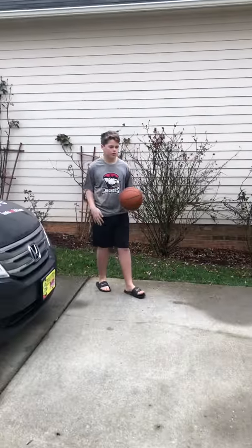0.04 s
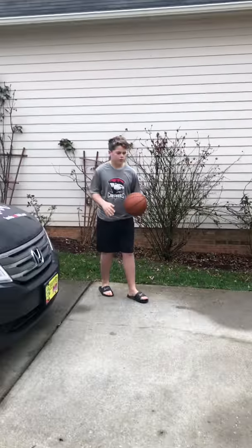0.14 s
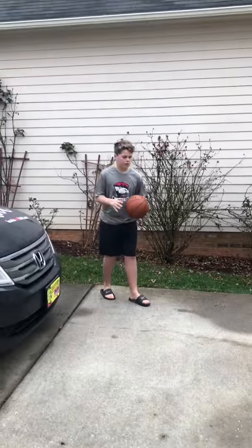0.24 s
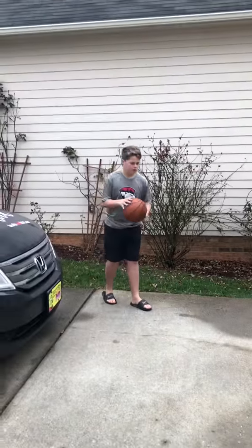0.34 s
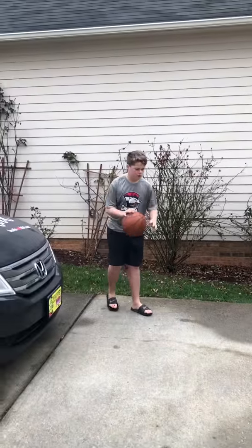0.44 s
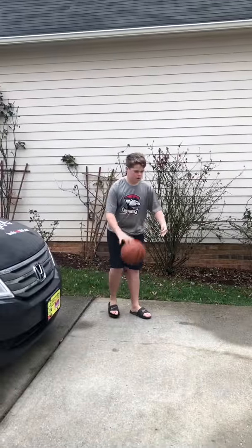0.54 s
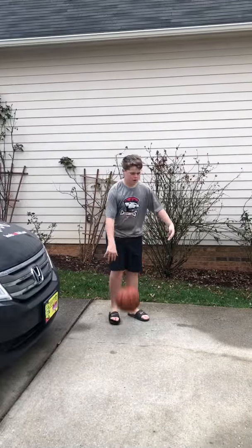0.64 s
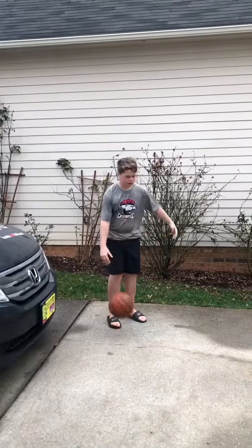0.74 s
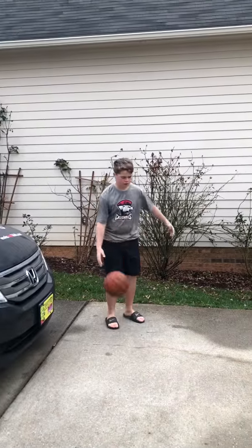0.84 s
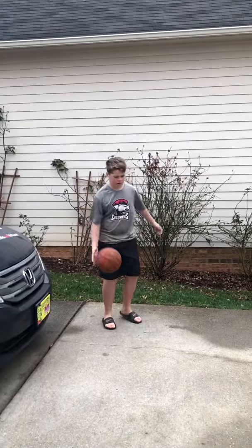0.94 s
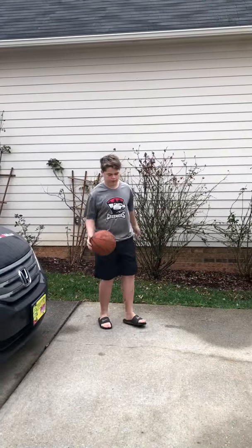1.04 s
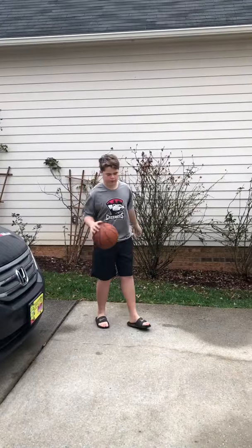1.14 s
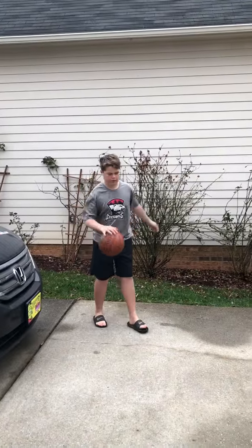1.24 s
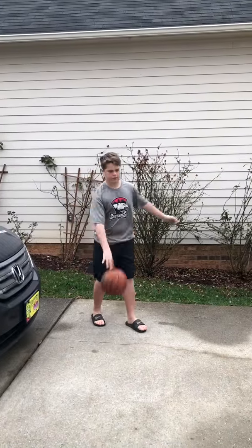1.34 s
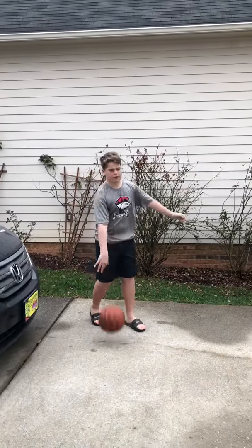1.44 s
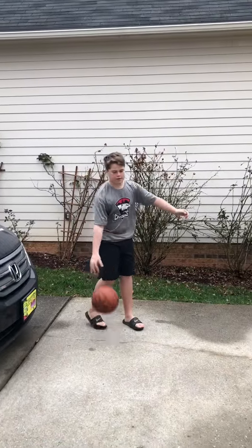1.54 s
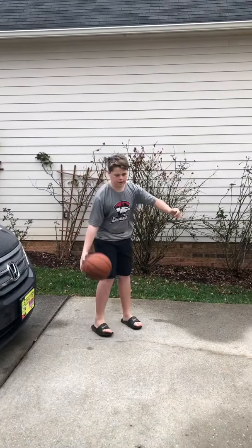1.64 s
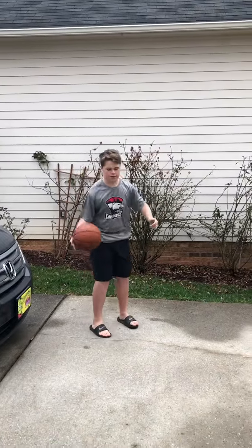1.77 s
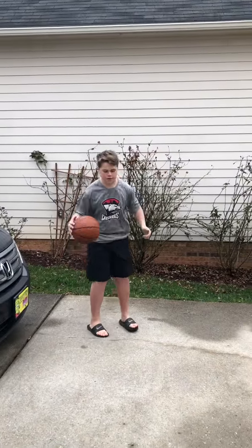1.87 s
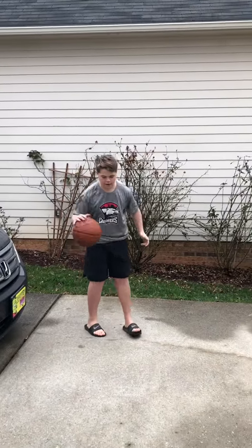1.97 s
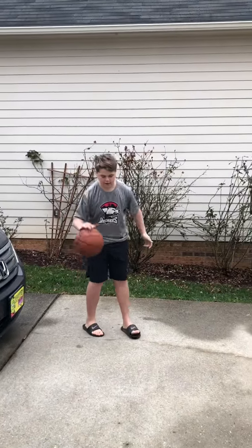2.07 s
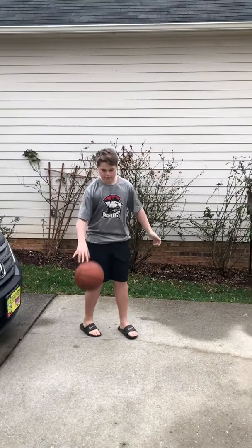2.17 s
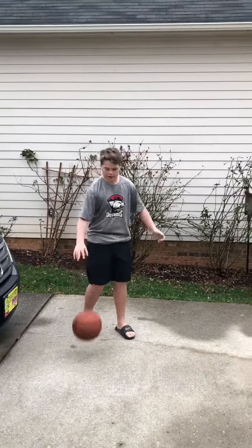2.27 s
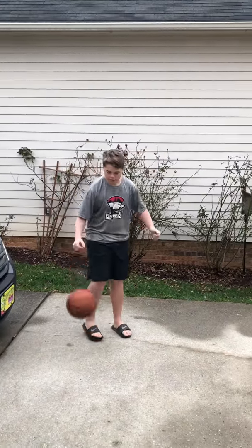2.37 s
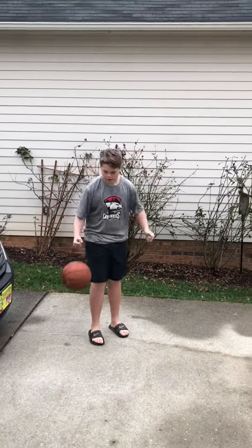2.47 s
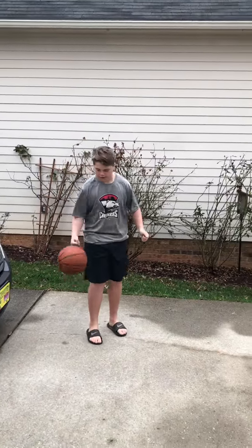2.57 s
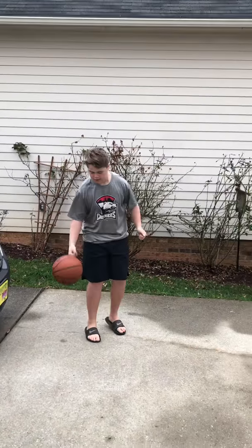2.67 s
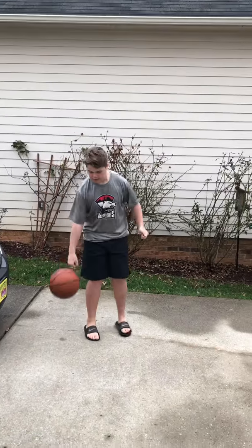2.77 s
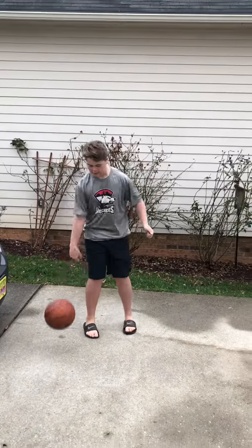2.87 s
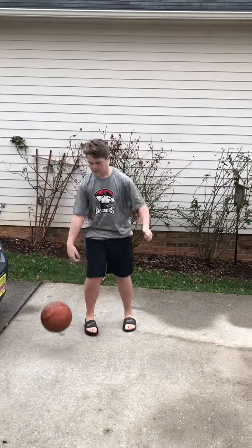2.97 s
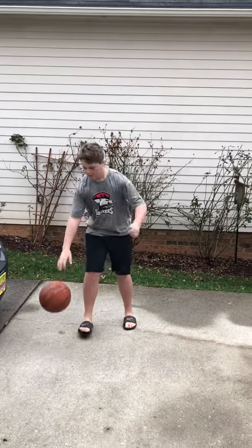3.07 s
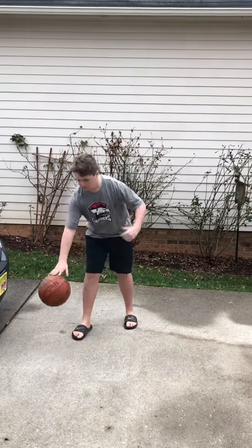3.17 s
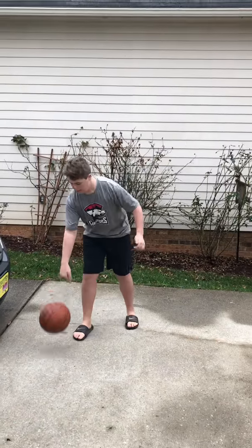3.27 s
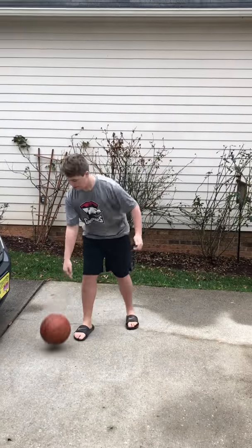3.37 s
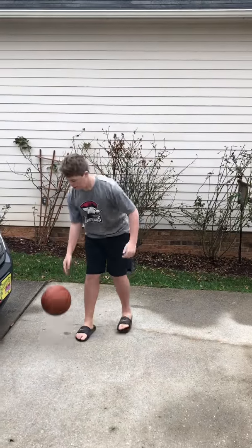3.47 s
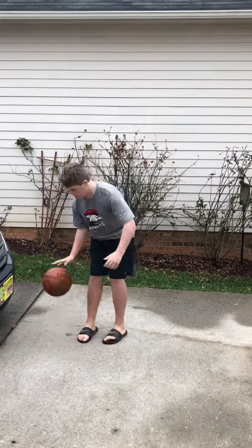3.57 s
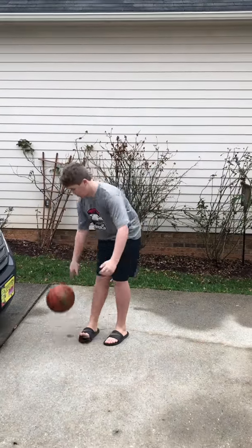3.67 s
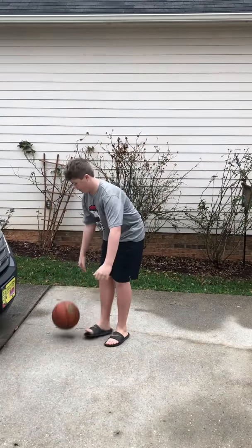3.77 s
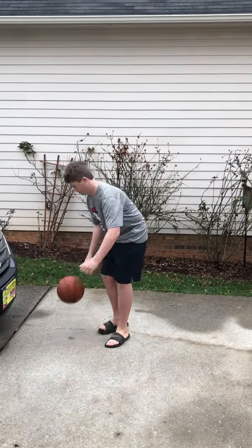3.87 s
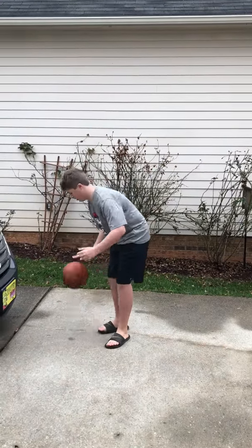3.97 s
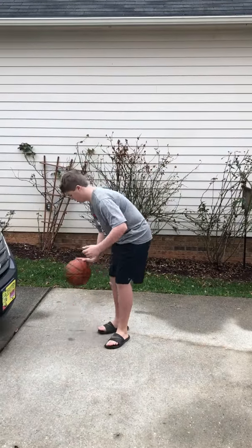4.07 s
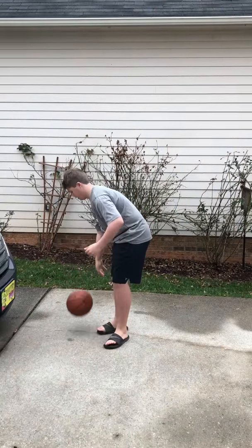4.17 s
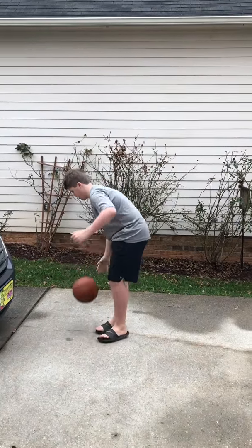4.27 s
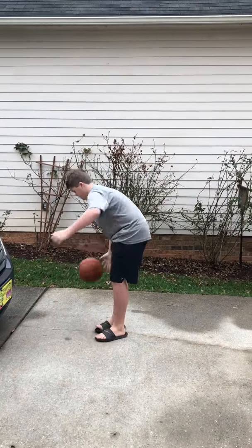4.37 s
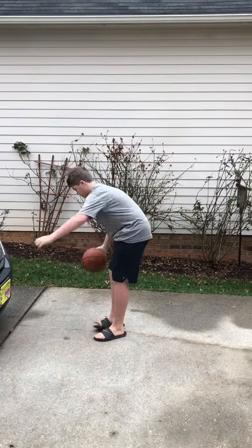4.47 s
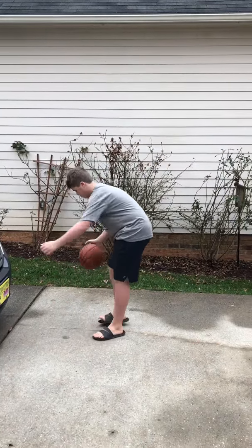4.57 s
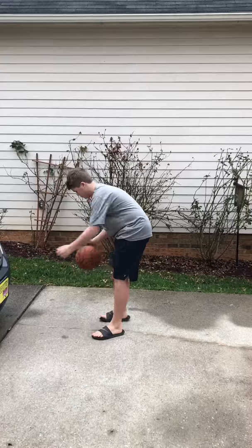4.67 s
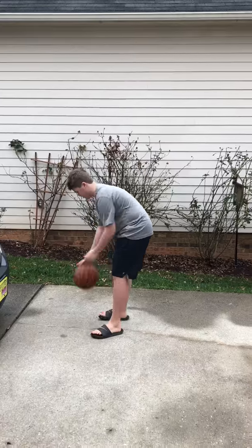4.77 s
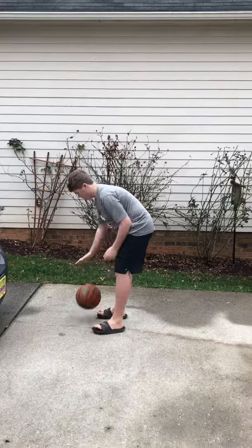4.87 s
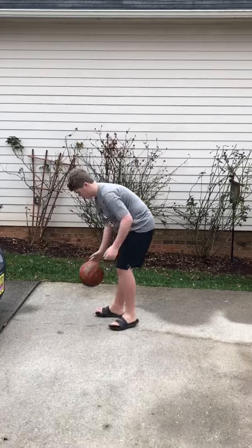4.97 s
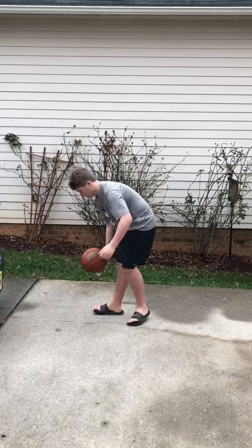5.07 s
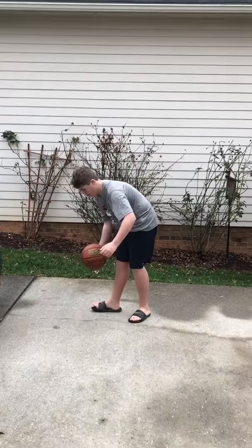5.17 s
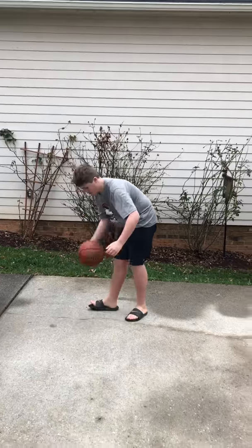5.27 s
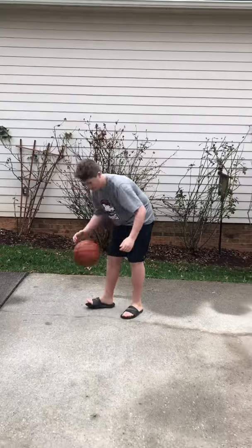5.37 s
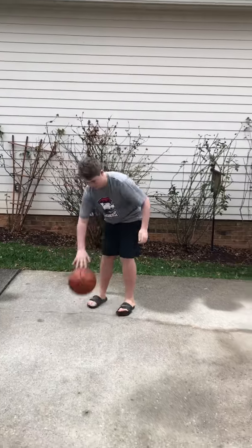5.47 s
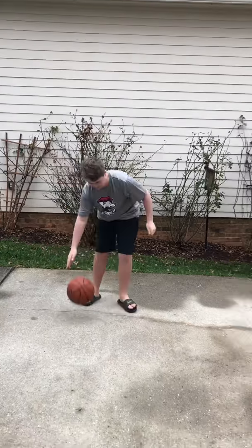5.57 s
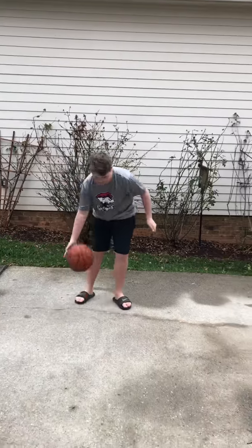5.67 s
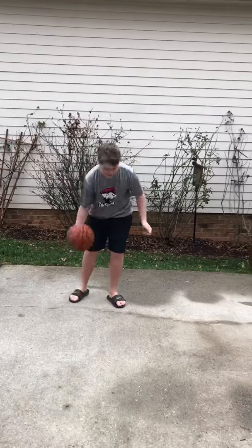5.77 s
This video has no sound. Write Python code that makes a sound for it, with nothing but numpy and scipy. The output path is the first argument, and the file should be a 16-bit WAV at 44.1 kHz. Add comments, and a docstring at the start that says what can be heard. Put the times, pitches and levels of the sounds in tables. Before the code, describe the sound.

A basketball bounces on a concrete driveway with deep thumps and sharp smacks, while sandals scuff and a faint low hum lingers outdoors.

```python
"""A basketball is dribbled on a concrete driveway in front of a house wall with lapped siding.
Each bounce sums damped shell modes (thump), filtered noise (knock, crack) and ringing modes of the air inside.
Hands pat the ball with swelling pops; sandals scuff and slap as noise under grit and swell envelopes.
A filtered echo train (wall) and decaying noise bands (yard) answer; coloured noise and a wavering
sine make the outdoor air and a distant machine's hum."""
import sys
import numpy as np
from scipy import signal
from scipy.fft import rfft, irfft
from scipy.io import wavfile

SR = 44100
rng = np.random.default_rng(int(sys.argv[2]) if len(sys.argv) > 2 else 0)


def log_audio(samples):
    """Write samples as a 16-bit WAV file to the path given in sys.argv[1]."""
    # one column per channel
    frames = np.atleast_2d(samples).T
    # limit to full scale, then quantise
    limited = np.clip(frames, -1, 1)
    pcm = np.round(limited * 32767).astype(np.int16)
    wavfile.write(sys.argv[1], SR, pcm)


N = 256662
TIME = np.arange(N) / SR
AGE = TIME[:SR * 3 // 4]   # time since a contact [s]
WALL_ECHO_S = 0.0226

# soles dragging on concrete: (peak time [s], level [dB], time to swell or die by 10 dB [s],
# grittiness [0-1], brightness [dB])
SCUFFS = [(.415, -57, .03, 0.85, 15), (0.985, -49.5, 0.03, 0.6, 10), (1.11, -52.5, 0.01, 0.78, -8),
          (1.272, -53.5, 0.06, 0.88, -2.5), (1.839, -56, .035, 0.6, -12), (2.0, -45.5, 0.02, 0.95, -1.5),
          (2.793, -44, 0.0541, 0.47, -4.5), (2.875, -47, 0.0259, .3, -7.5), (3.02, -50.5, 0.02, 0.5, 2),
          (3.188, -48.5, .011, 0.67, -4), (3.797, -34, 0.044, 0.05, -2.5), (4.212, -48.5, .04, 0.83, 0.5),
          (4.699, -41.5, 0.01, 0.54, -6), (4.877, -39.5, .01, 0.9, 4), (4.93, -47, 0.0441, .6, -14.5),
          (5.144, -42.5, 0.03, 0.33, 4), (5.425, -41, .038, 0.38, -4.5), (5.521, -46, 0.037, 0.15, -5),
          (5.627, -41, .034, 0, 4.5)]


def from_db(db):
    """Level in dB to amplitude."""
    return 10 ** (np.asarray(db) / 20)


def rms_one(x):
    """Scales to rms 1."""
    return x / np.sqrt(np.mean(x ** 2) + 1e-20)


def unit_blow(x):
    """Scales a short sound to rms 1 when its energy is counted over 10 ms."""
    return x / np.sqrt(np.sum(x ** 2) / (SR / 100))


def cut(x, hz, kind, order=2):
    """Butterworth filter."""
    return signal.sosfilt(signal.butter(order, hz, kind, fs=SR, output="sos"), x)


def at_hz(rows, hz, axis=1):
    """Reads one column of a table on a log-frequency axis."""
    rows = np.array(rows)
    return np.interp(np.log(np.maximum(hz, 1)), np.log(rows[:, 0]), rows[:, axis])


def colour(x, spectrum):
    """Shapes noise to a spectrum; rms 1."""
    gain = from_db(at_hz(spectrum, np.fft.rfftfreq(len(x), 1 / SR)))
    return rms_one(irfft(rfft(x) * gain, len(x)))


def drift(rate_hz):
    """Low-passed noise with rms 1, filter settled for 1 s."""
    return rms_one(cut(rng.standard_normal(N + SR), rate_hz, "low")[SR:])


def fade(t60_s):
    """Exponential decay by 60 dB in t60_s."""
    return np.exp(-np.log(1000) * AGE / t60_s)


def late(x, delay_s):
    """Delays a short sound."""
    return np.interp(AGE - delay_s, AGE, x, left=0)


def ring(hz, t60_s):
    """A struck mode: damped sine."""
    return np.sin(2 * np.pi * hz * AGE) * fade(t60_s)


def through(x, response):
    """Convolution that keeps the length."""
    return signal.fftconvolve(x, response)[:len(x)]


def add(track, start_s, sound):
    """Lays a sound into a track."""
    at = round(start_s * SR)
    track[at:at + len(sound)] += sound[:N - at]


def dribble(direct_ping_db=-3, scattered_knock_db=-1.5, wall_spread_s=0.0005):
    """Thump, knock, crack and ping per bounce; each lands on a new spot, so the wall delay scatters."""
    # bounces: (time [s], thump [dB], lift-off boom re thump [dB], knock [dB], crack [dB], crack pitch [Hz])
    bounces = [(0.7376, 2.5, 1, -21, -24.5, 1830), (1.4788, 4, 2, -24.5, -22, 2580),
               (2.3220, 2, 2, -29, -21, 2560), (2.9507, -7.5, 8, -27, -29.5, 2170),
               (3.3711, 0, -2.5, -31.5, -23.5, 2420), (3.7947, -0.5, -1, -26, -25.5, 2380),
               (4.2291, 4.5, -7, -27, -30.5, 1940), (4.8817, -3, 1.5, -35, -25, 2860),
               (5.5791, 4.5, -0.5, -23.5, -22.5, 2820)]
    out = np.zeros(N)
    for start_s, thump_db, boom_db, knock_db, crack_db, crack_hz in bounces:
        body = from_db(thump_db) * thump(boom_db)
        air = ping()
        direct_top = crack(crack_hz) + from_db(direct_ping_db) * air
        ball = body + from_db(knock_db) * knock() + from_db(crack_db) * direct_top

        # summed over all directions, the patter evens out into one plain slap
        scattered_top = crack(crack_hz, flutter=0) + air
        scattered_knock = from_db(knock_db + scattered_knock_db) * knock()
        all_round = body + scattered_knock + from_db(crack_db) * scattered_top

        echo_s = WALL_ECHO_S + wall_spread_s * rng.standard_normal()
        add(out, start_s, ball + wall(ball, echo_s) + yard(all_round))
    return out


def thump(boom_db):
    """Two shell modes swing against each other while the ball is squashed; lower ones follow as it lifts off."""
    # slow shell modes: (frequency [Hz], signed swing [amplitude], t60 [s], start after first contact [s],
    # share in the lift-off boom [0-1])
    shell_modes = [(251.6, -0.36, 0.031, 0.00064, 0.1), (331, 0.34, 0.036, 0.0008, 0),
                   (131.8, 0.21, 0.056, 0.00798, 0.87), (96.1, 0.021, 0.24, 0.01675, 0.9)]
    swing = np.zeros(len(AGE))
    for hz, height, t60_s, start_s, share in shell_modes:
        mode = ring(hz * rng.normal(1, 0.011), t60_s)
        swing += height * from_db(boom_db * share) * late(mode, start_s)
    # the thump has little deep bass: high-passed at 80 and 40 Hz
    return cut(cut(swing, 80, "high"), 40, "high", order=1)


def crack(hz, flutter=0.1, cycles=2.7, flutter_t60_s=0.027, low_hz=750, edge=0.0043):
    """The skin slaps down, then its pebbles patter: impulse plus fading noise drives a short ring."""
    slap = AGE == 0
    patter = flutter * rng.standard_normal(len(AGE)) * fade(flutter_t60_s)
    force = patter - slap
    return unit_blow(cut(through(force, ring(hz, cycles / hz)) + edge * force, low_hz, "high"))


def knock(low_hz=385, high_hz=1420, t60_s=0.031):
    """Dense, quickly damped ripples run round the skin as the contact patch spreads: band-passed noise."""
    return unit_blow(cut(rng.standard_normal(len(AGE)) * fade(t60_s), [low_hz, high_hz], "band"))


def ping(spread_db=2.0):
    """The enclosed air rings, with a new balance of modes on every bounce."""
    # modes of the air inside the ball: (frequency [Hz], mean level [dB], t60 [s])
    air_modes = [(541, -20.5, 0.35), (1614, -26, 0.6), (2260, -29, 0.87), (2590, -47, 0.35),
                 (2840, -47, 0.32), (3200, -49, .6), (3474, -40, 0.54), (3600, -33.5, 0.69),
                 (4350, -36, .45)]
    return sum(from_db(db + spread_db * rng.standard_normal()) * ring(hz, t60_s)
               for hz, db, t60_s in air_modes)


def hands(palm_cycles=3.14, palm_lag_s=0.0011, skin_db=-17):
    """A small smack of skin, then the soft, swelling pop of the palm."""
    # hands on the ball: (time [s], peak of the pop [dB], pitch [Hz])
    pats = [(2.621, -43, 507), (3.216, -34.5, 300), (3.645, -31, 347), (3.963, -35.5, 414),
            (4.083, -21.5, 400), (4.487, -38, 530), (4.681, -27.5, 330), (5.178, -31.5, 506),
            (5.468, -34.5, 523)]
    out = np.zeros(N)
    for start_s, db, hz in pats:
        pop = late(ring(hz, palm_cycles / hz) * AGE, palm_lag_s)   # factor AGE makes it swell
        smack = knock(low_hz=1030, high_hz=1700, t60_s=0.023)
        add(out, start_s, from_db(db) * (pop / np.abs(pop).max() + from_db(skin_db) * smack))
    return out


def sandals(sand_db=3.5, split_hz=4800, slap_bright_db=-1.5):
    """Soles rub in swells that grit breaks into grains; slaps and ticks start at once and die fast."""
    # colour of rubber on concrete: (frequency [Hz], density [dB per Hz])
    sole_spectrum = [(200, -24.5), (700, -10.5), (1300, -6.5), (2200, -2), (3500, -4), (5500, -5.5),
                     (9000, -10), (15000, -12.5)]
    # sharp slaps of a sandal or of the fingers: (time [s], level [dB], t60 [s])
    slaps = [(0.4008, -44, 0.014), (0.623, -49.5, 0.022), (1.069, -44, 0.059), (1.297, -39.5, 0.018),
             (1.649, -27.5, 0.029), (1.653, -25, 0.021), (1.949, -38.5, 0.045), (2.007, -40.5, 0.028),
             (2.494, -46.5, .1), (2.784, -37, .015), (3.571, -36.5, 0.053), (3.586, -30, 0.048),
             (3.739, -36.5, 0.028), (3.9408, -40, 0.082), (4.0816, -35.5, 0.013), (4.341, -49, 0.076),
             (4.684, -38.5, 0.094), (5.386, -34.5, 0.044), (5.416, -30.5, .022), (5.447, -30.5, 0.025)]
    grains = grit_power()
    dull_power, bright_power = np.zeros(N), np.zeros(N)
    for level_db, grit, bright_db in drags():
        near = level_db > -120   # skip the inaudible part
        share = np.clip(grit, 0, 1)
        grain_power = 1 - share + share * grains[near] / grains.mean()
        level = from_db(level_db[near]) * np.sqrt(grain_power)
        dull_power[near] += (level * from_db(-bright_db / 2)) ** 2
        bright_power[near] += (level * from_db(bright_db / 2)) ** 2
    for start_s, db, t60_s in slaps + loose_ticks():
        add(dull_power, start_s, (from_db(db) * fade(t60_s)) ** 2)
        add(bright_power, start_s, (from_db(db + slap_bright_db) * fade(t60_s)) ** 2)

    # the rubbing is itself a stream of sand ticks of very unequal size
    sand = from_db(sand_db * drift(2900))
    rub = colour(rng.standard_normal(N) * sand, sole_spectrum)
    low = cut(rub, split_hz, "low", order=1)
    return np.sqrt(dull_power) * low + np.sqrt(bright_power) * (rub - low)


def drags(shuffle_grit=0.59, shuffle_bright_db=-2):
    """Yields (level curve [dB], grittiness, brightness [dB]) for the shuffling and for each scuff."""
    # faint gritty shuffling between the scuffs: (time [s], level [dB])
    shuffle = [(.28, -76), (.37, -58), (.5, -85), (.59, -73), (.66, -63.5), (1.35, -66), (1.75, -67),
               (2.12, -61.5), (2.25, -67), (2.72, -60), (3.1, -74), (3.32, -60), (3.55, -66), (4.52, -64),
               (4.64, -77), (4.8, -58), (5.08, -80), (5.8, -61.5)]
    yield np.interp(TIME, *np.transpose(shuffle)), shuffle_grit, shuffle_bright_db
    for peak_s, db, swell_s, grit, bright_db in SCUFFS:
        yield db - 10 * ((TIME - peak_s) / swell_s) ** 2, grit, bright_db


def grit_power(per_s=170, size_db=1.5, grain_t60_s=0.018):
    """Grains crack under the sole at random, each with a sudden start; returns their power."""
    sizes = from_db(size_db * rng.standard_normal(N)) * (rng.random(N) < per_s / SR)
    return np.abs(through(sizes ** 2, fade(grain_t60_s) ** 2))


def loose_ticks(per_scuff=3, tick_db=-3.5, spread_db=6, reach=1.5, t60_s=0.0092):
    """Each scuff snaps loose grains around it, louder on grittier ground: (time [s], level [dB], t60 [s])."""
    ticks = []
    for peak_s, db, swell_s, grit, _ in SCUFFS:
        grit_db = 10 * np.log10(max(grit, 1e-3))
        for when, size in rng.uniform(-2.6, 2, (per_scuff, 2)):
            start_s = peak_s + reach * swell_s * when
            ticks.append((start_s, db + tick_db + spread_db * size + grit_db, t60_s))
    return ticks


def wall(x, delay_s, echo_db=-10, low_hz=190, dull_hz=900, laps_db=-31, laps_hz=1500, laps_t60_s=0.064):
    """One dull echo, trailed by a quick even train of tiny ones from the laps of the siding."""
    click = 1. * (AGE == 0)
    flat = from_db(echo_db) * cut(cut(click, low_hz, "high", order=1), dull_hz, "low", order=1)
    train = np.diff(np.floor(AGE * laps_hz), prepend=0)   # one click per lap
    laps = cut(from_db(laps_db) * train * fade(laps_t60_s), [900, 4000], "band", order=1)
    return through(x, late(flat + laps, delay_s))


def yard(x):
    """Scatter from bushes, car and houses: bands of noise that build up and die away."""
    # diffuse answer; the deepest band builds up slowest, the others within about 10 ms:
    # (frequency [Hz], level [dB], t60 [s], build-up [s])
    yard_bands = [(60, -11, 0.64, 0.055), (119, -10, 0.44, 0.0095), (300, -13, 0.53, 0.01),
                  (580, -9, 0.37, 0.0028), (1500, -10, 0.49, 0.0059), (3050, -12, 0.46, 0.0098),
                  (5940, -12.5, 0.28, 0.0085), (14100, -10.5, 0.15, 0.0048)]
    edges_hz = np.geomspace(55, 17000, 10)
    response = np.zeros(len(AGE))
    for low_hz, high_hz in zip(edges_hz, edges_hz[1:]):
        hz = np.sqrt(low_hz * high_hz)
        build_up = 1 - np.exp(-(AGE / at_hz(yard_bands, hz, axis=3)) ** 2)
        shape = fade(at_hz(yard_bands, hz, axis=2)) * build_up
        band = rms_one(cut(rng.standard_normal(len(AGE)), [low_hz, high_hz], "band") * shape)
        # scaled so that the table level is the gain within the band
        width_gain = np.sqrt(2 * (high_hz - low_hz) / SR / len(AGE))
        response += band * from_db(at_hz(yard_bands, hz)) * width_gain
    return through(x, response)


def background(air_db=-57, low_hz=52, hum_hz=123.4, hum_db=-60.5, waver_hz=1.9, waver_db=-1.0):
    """Steady outdoor air as coloured noise; a distant machine's hum as a sine wavering in pitch and level."""
    # outdoor air: (frequency [Hz], density [dB per Hz])
    air_spectrum = [(25, -17), (60, -5), (125, -10), (190, -8.5), (300, -12.5), (420, -17.5), (850, -19),
                    (1700, -25.5), (2900, -35.5), (4300, -37), (6400, -41), (16000, -47)]
    phase = 2 * np.pi * np.cumsum(hum_hz + waver_hz * drift(7.5)) / SR
    hum = from_db(hum_db + waver_db * drift(22)) * np.sqrt(2) * np.sin(phase)
    air = cut(colour(rng.standard_normal(N), air_spectrum), low_hz, "high")
    return hum + from_db(air_db) * air


def scene(player_echo_db=2, player_yard_db=2.0):
    """Ball and player before the wall, over the background."""
    player = hands() + sandals()
    wall_echo = from_db(player_echo_db) * wall(player, WALL_ECHO_S)
    yard_echo = from_db(player_yard_db) * yard(player)
    return (dribble() + player + wall_echo + yard_echo + background())[None]


def record(dry, start_s=0.257, cutoff_hz=16000):
    """The microphone opens over 10 ms after a moment of silence; the top is cut steeply."""
    opened = dry * np.clip((TIME - start_s) / 0.01, 0, 1)
    return signal.sosfilt(signal.ellip(10, 0.1, 80, cutoff_hz, fs=SR, output="sos"), opened)


dry = scene()
out = record(dry)
log_audio(out)
```